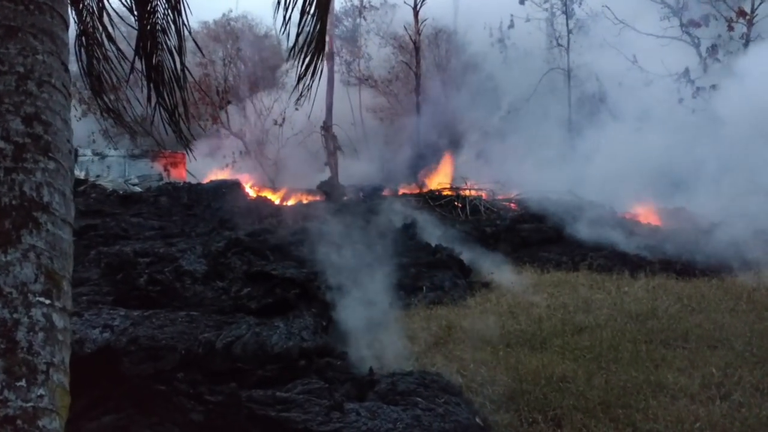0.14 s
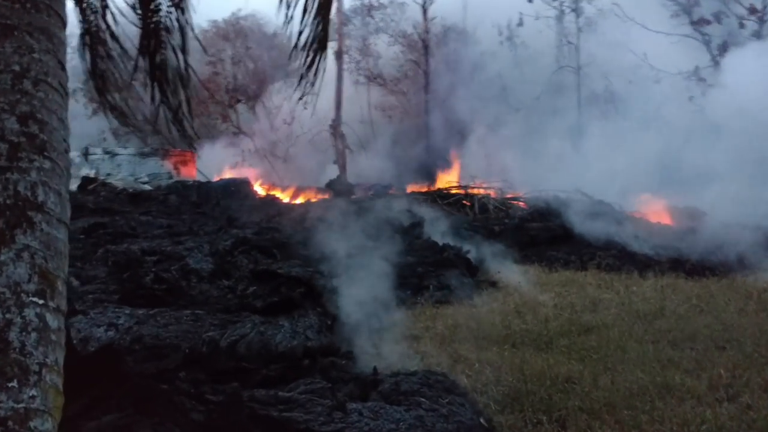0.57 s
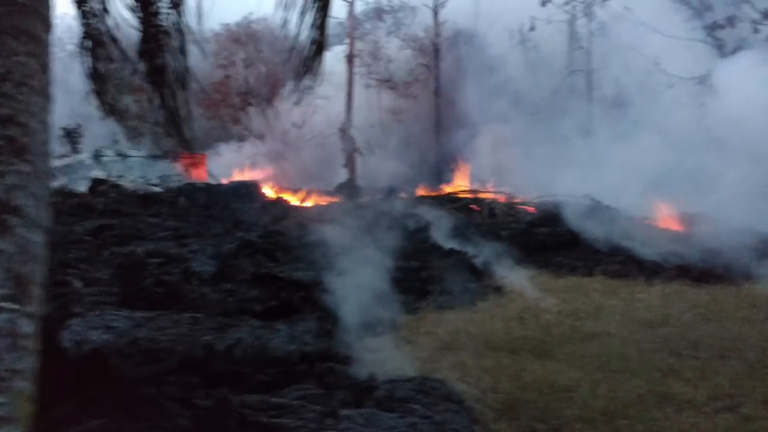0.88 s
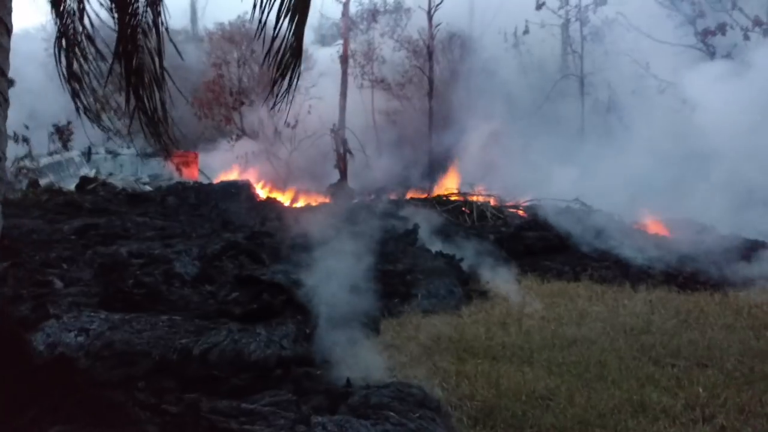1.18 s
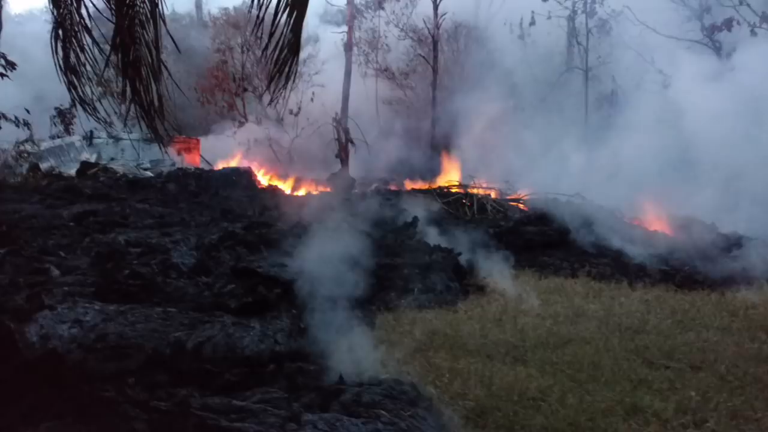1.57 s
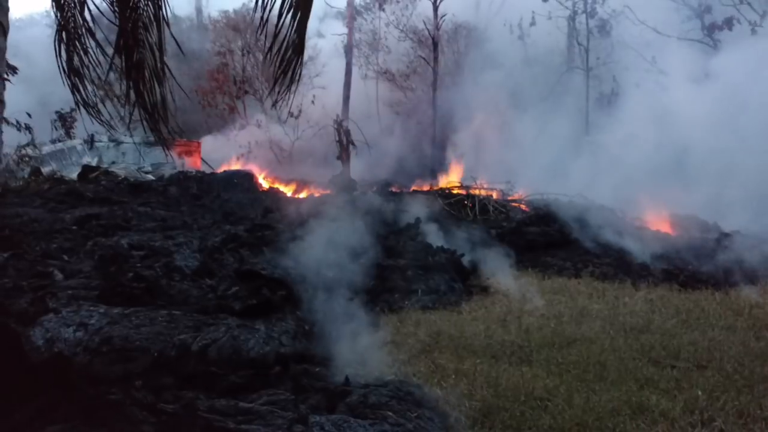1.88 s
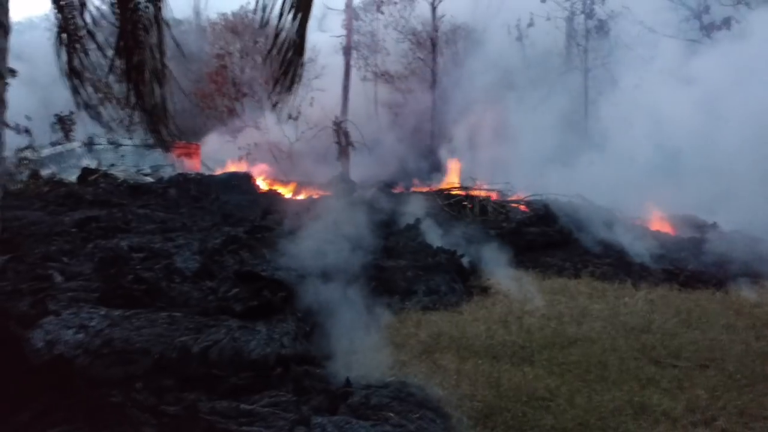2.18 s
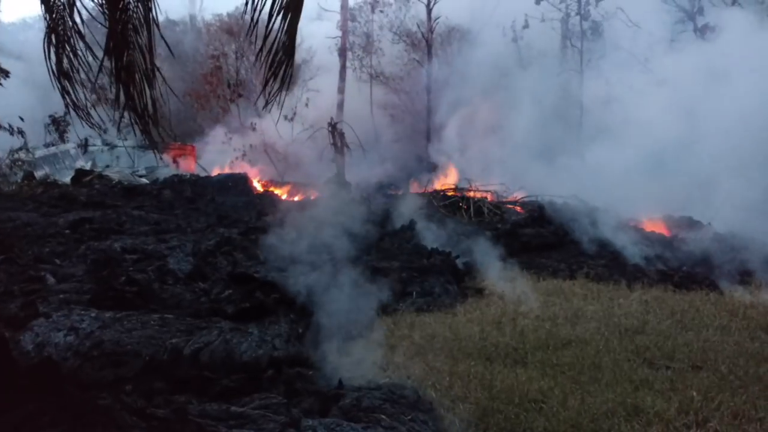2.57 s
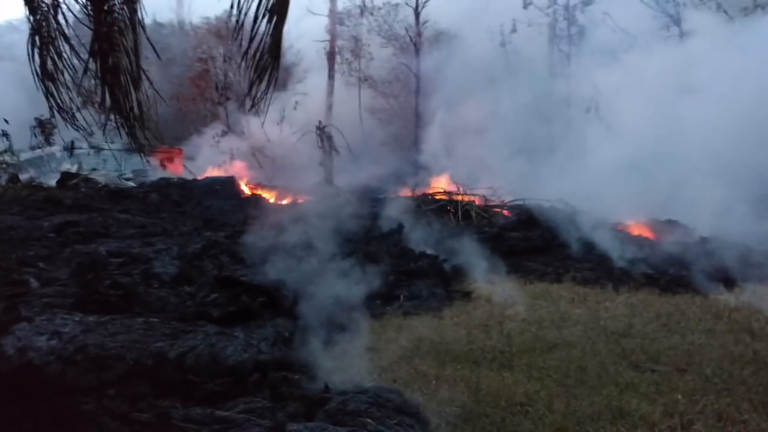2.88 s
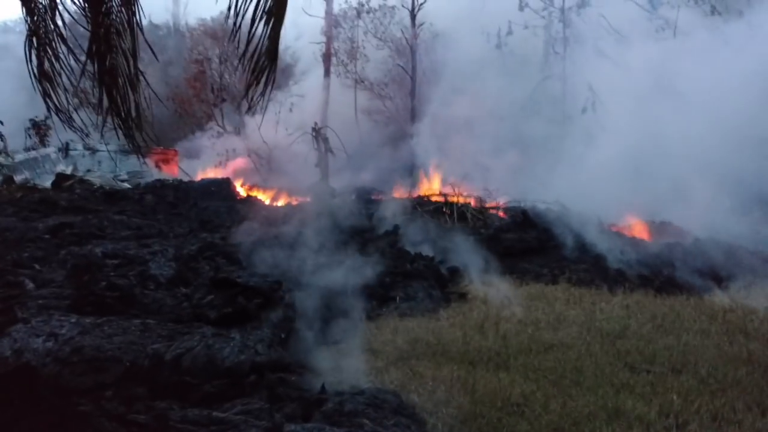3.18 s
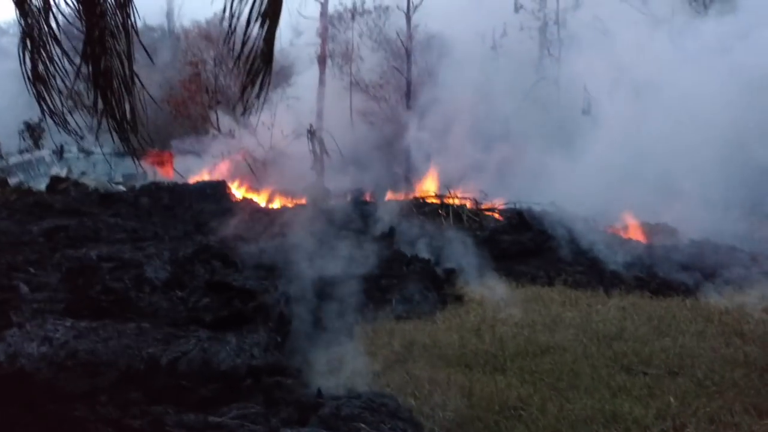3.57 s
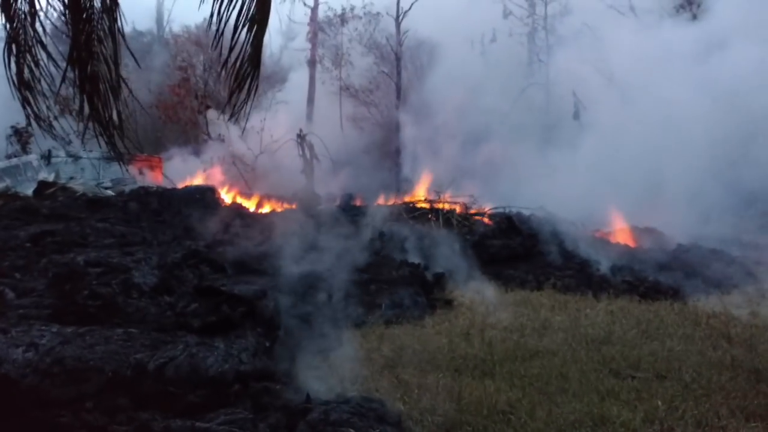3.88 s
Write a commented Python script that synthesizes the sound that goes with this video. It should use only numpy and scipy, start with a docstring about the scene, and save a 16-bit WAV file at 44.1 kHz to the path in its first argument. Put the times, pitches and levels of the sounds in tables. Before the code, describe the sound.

A turbulent gas jet flutters and gusts, its hollow throaty pitch wavering above a deep rumble. After a stronger, brighter surge it drops away, leaving faint steady outdoor hiss, dry little sputters, dull pops and high gliding bird chirps with short echoes from trees. Within about half a second the rush swells back and holds. Open air, natural wide stereo.

```python
"""Gas jets from a ground fissure

A low rumble, a hollow rush and a hiss, all banded turbulence noise, surge, ease and swell again.
In the lull the vent sputters in noise bursts and decaying pops; a small bird twitters in gliding tones
over a faint, steady outdoor hiss.
Two close microphone ports hear it; the recorder widens the image by inverted, delayed crossfeed."""
import sys
import numpy as np
from scipy import signal
from scipy.fft import rfft, irfft, next_fast_len
from scipy.io import wavfile
from scipy.ndimage import uniform_filter1d

SR = 44100
rng = np.random.default_rng(int(sys.argv[2]) if len(sys.argv) > 2 else 0)


def store_wav(level_fs):
    """Save 16-bit WAV to argv[1]."""
    pcm = np.round(np.clip(np.atleast_2d(level_fs), -1, 1) * 32767)
    wavfile.write(sys.argv[1], SR, pcm.T.astype(np.int16))


N = 178428   # samples

# Course of the jet, before colour and flicker:
# columns: t/s, rush level/dB, rumble level/dB, hiss level/dB, low-treble level/dB
JET_LEVELS = [(0.0, -29.5, -23.5, -46, -37), (0.06, -29.5, -33, -48, -40.5), (0.14, -30, -30, -45.5, -38),
              (0.23, -24.5, -29, -44.5, -36.5), (0.3, -27.5, -29.5, -45.5, -36.5),
              (0.37, -26.5, -28, -45, -39), (0.43, -24.5, -27.5, -41, -32), (0.5, -27, -33, -41, -37.5),
              (0.56, -29.5, -27, -43, -38), (0.66, -31.5, -33.5, -47.5, -41), (0.76, -31, -30.5, -46, -39),
              (0.9, -32, -34.5, -47, -39.5), (1.0, -30.5, -31, -43, -37.5),
              (1.16, -23.5, -28.5, -36, -30.5), (1.27, -27, -32, -40.5, -34.5),
              (1.4, -21.5, -30, -37.5, -32.5), (1.5, -22.5, -31, -37, -31), (1.6, -26, -34, -39, -35),
              (1.71, -23, -32.5, -42, -31), (1.79, -26, -34, -44, -38), (1.95, -34, -34.5, -55, -44),
              (2.2, -34, -35, -55, -46), (2.3, -31.5, -32.5, -48, -43.5), (2.47, -36, -37, -60, -48.5),
              (2.6, -38, -37.5, -57.5, -48.5), (2.69, -42, -35, -57, -42.5), (2.73, -44, -43, -60, -55),
              (2.87, -44, -42, -67, -52), (3.02, -39, -33.5, -63, -52.5), (3.14, -34, -34.5, -57.5, -46),
              (3.22, -32, -29.5, -52.5, -44), (3.29, -28.5, -28.5, -47.5, -38),
              (3.34, -25.5, -26, -43, -38), (3.4, -25.5, -28, -43, -34.5), (3.5, -23, -27.5, -40.5, -32),
              (3.62, -23, -30.5, -41, -34), (3.75, -22.5, -29.5, -41, -33), (3.84, -21.5, -29, -39, -30.5),
              (3.97, -24.5, -35.5, -43.5, -37), (4.05, -26.5, -29.5, -45.5, -36)]


def from_db(db):
    """Level to amplitude: 20 dB is a factor of ten."""
    return 10 ** (np.asarray(db) / 20)


def rms_one(x):
    """Normalization of the mean power to 1."""
    return x / np.sqrt(np.mean(x ** 2) + 1e-20)


def in_time(rows):
    """Linear interpolation of the columns after t/s, one value a sample."""
    s, *columns = np.transpose(rows)
    return [np.interp(np.arange(N) / SR, s, column) for column in columns]


def at_hz(points, hz, column=1):
    """Linear interpolation of a table column on a log-frequency axis."""
    points = np.array(points)
    return np.interp(np.log(hz), np.log(points[:, 0]), points[:, column])


def drift(rate_hz):
    """Slow random fluctuation of rms 1: noise through two equal one-pole low-passes."""
    step = 20   # samples between coarse noise values
    r = np.exp(-2 * np.pi * rate_hz * step / SR)
    noise = rng.standard_normal(N // step + 2002)
    slow = rms_one(signal.lfilter([1], [1, -2 * r, r * r], noise)[2000:])   # start-up cut away
    return np.interp(np.arange(N) / step, np.arange(len(slow)), slow)


def band(x, low_hz, high_hz):
    """Butterworth band-pass: maximally flat between its edges."""
    sos = signal.butter(2, [low_hz, min(high_hz, .45 * SR)], "band", fs=SR, output="sos")
    return signal.sosfilt(sos, x)


def lagged(hz, lag_s):
    """Frequency response of a delay: phase falls linearly with frequency."""
    return np.exp(-2j * np.pi * hz * lag_s)


def port_noise():
    """Partial coherence: white noise common to both ports but lagged, plus a scattered part for each."""
    # What the ports hear alike and how they differ:
    # columns: f/Hz, common power share (0-1), right-port lag/s, left-over-right level/dB
    coherence = [(40, 0.995, 1e-6, -2), (75, 0.99, 1e-6, 0.5), (132, 1, 1e-6, 0.45), (242, 0.98, 1e-6, 0),
                 (714, 0.88, 5e-6, -3), (1090, 0.56, 0.00007, -5), (1500, 0.29, 0.00014, 2),
                 (2260, 0.69, 0.000062, -2.5), (2490, 0.96, 0.00029, 6), (3140, 0, 0.000037, 12.5),
                 (3900, 0.81, 0.00009, 5), (8500, 0.11, 0.000057, 3), (12700, 0.33, 0.00016, -3.5)]
    size = next_fast_len(N)
    hz = np.maximum(np.arange(size // 2 + 1) * SR / size, 1)
    common, left, right = rfft(rng.standard_normal((3, size)))
    share, lag_s, balance_db = (at_hz(coherence, hz, column=c) for c in range(1, 4))
    share = np.clip(share, 0, 1)
    direct = np.sqrt(share) * common * np.array([np.ones(len(hz)), lagged(hz, lag_s)])
    both = direct + np.sqrt(1 - share) * np.array([left, right])
    both *= from_db([balance_db / 2, -balance_db / 2])
    return irfft(both, size)[:, :N]


def jet_and_outdoors():
    """Turbulence noise in third-octave bands; the steady outdoor hiss adds to the jet in power."""
    # Spectral colour added to the jet's course; columns: f/Hz, level/dB
    jet_colour = [(30, -8), (60, 16.5), (125, 28.5), (220, 26), (310, 14), (480, 9.5), (680, 10.5),
                  (1000, 5), (1350, 5.5), (2100, 3.5), (2800, 7.5), (3500, 10.5), (4400, 7), (6000, 11.5),
                  (9300, 11), (10500, 6), (15000, -1.5)]
    # Steady hiss of leaves, insects and far vents, as gain on the white noise; columns: f/Hz, level/dB
    outdoors = [(100, -26), (1000, -34), (2500, -86), (4500, -30), (7000, -47.5), (9000, -68), (15000, -59)]
    # where each level rules; between these pitches one hands over to the next
    rumble_top_hz, rush_hz, low_treble_hz, hiss_foot_hz = 272, (670, 1986), (2720, 4530), 6000
    strong_jet_tilt = .2   # dB per octave that the rush brightens for each dB it gains

    rush_db, rumble_db, hiss_db, treble_db = uniform_filter1d(in_time(JET_LEVELS), size=1500)   # smoothed
    white = [port_noise(), port_noise()]   # neighbouring bands get unrelated noise
    # eddies flicker all bands together, regions of four bands in part, and each band alone
    eddies_db = 0.7 * drift(16) + 0.6 * drift(60)
    region_db = [0.6 * drift(12) for _ in range(8)]
    edges, out = 22 * 2 ** (np.arange(30) / 3), 0   # Hz
    for k, (low, high) in enumerate(zip(edges, edges[1:])):
        hz = np.sqrt(low * high)
        deep = at_hz([(rumble_top_hz, 1), (rush_hz[0], 0)], hz)
        bright = at_hz([(rush_hz[1], 0), (low_treble_hz[0], 1)], hz)
        top = at_hz([(low_treble_hz[1], 0), (hiss_foot_hz, 1)], hz)
        middle = 1 - deep - bright
        level_db = deep * rumble_db + middle * rush_db + (bright - top) * treble_db + top * hiss_db
        level_db += middle * strong_jet_tilt * (rush_db - rush_db.mean()) * np.log2(hz / 900)
        flicker_db = (1 - .6 * deep) * eddies_db + region_db[k // 4] + 0.8 * drift(20)
        jet = from_db(level_db + at_hz(jet_colour, hz) + flicker_db)
        gain = np.hypot(jet, from_db(at_hz(outdoors, hz)))
        out = out + gain * band(white[k % 2], low, high)
    return out


def throat():
    """Resonance: the rush rings the vent throat in two narrow noise bands that glide together."""
    # Hollow tones; columns: t/s, lower pitch f/Hz, level over the rush/dB (before the port levels)
    tones = [(0.0, 685, -9), (0.3, 721, -27), (0.55, 640, -6.5), (0.9, 639.4, -11), (1.15, 677.5, -15),
             (1.3, 599, -9.5), (1.4, 727, -9), (1.5, 630, -10), (1.75, 676, -11), (2.0, 678, -9),
             (2.8, 684.6, -8.5), (3.3, 697.3, -12), (3.7, 759.6, -12), (4.05, 756, -16)]
    # Level added at the left and right port/dB
    port_db = [
        [-8.5],
        [-6.5],
    ]
    width_hz, overtone, overtone_db = 77, 1.9, -2.5   # the overtone is a multiple of the lower pitch

    hz, over_db = in_time(tones)
    turns, out = np.cumsum(uniform_filter1d(hz, size=1500)) / SR, 0
    narrow = signal.butter(2, width_hz / 2, fs=SR, output="sos")
    settle = SR // 10   # filter start-up, cut away
    for multiple, level_db in ((1, 0), (overtone, overtone_db)):
        noise = rng.standard_normal((2, N + settle))
        a, b = rms_one(signal.sosfilt(narrow, noise)[:, settle:])
        phase = 2 * np.pi * multiple * turns
        tone = a * np.cos(phase) + b * np.sin(phase)   # low-pass noise moved up to the pitch
        out = out + from_db(level_db + 3.1 * drift(12.0)) * tone   # comes in patches
    rush_db = uniform_filter1d(in_time(JET_LEVELS)[0], size=1500)
    return from_db(port_db + over_db + rush_db) * out


def puffs():
    """Gated turbulence: each sputter is a gritty burst of noise, quick to open and quick to shut."""
    # Sputters of the vent; columns: t/s, length/s, rms level before gating/dB, low edge f/Hz, high edge f/Hz
    sputters = [(0.415, 0.043, -37, 2500, 11900), (0.761, 0.028, -36, 400, 9000),
                (2.252, 0.015, -35.5, 2000, 7890), (2.278, 0.008, -41, 2800, 4980),
                (2.291, 0.0059, -31, 3000, 10600), (2.322, 0.022, -31.5, 250, 750),
                (2.576, 0.0054, -36.5, 600, 2000), (2.584, 0.014, -38, 200, 2000),
                (2.615, 0.0048, -46, 800, 2000), (2.645, 0.0068, -41, 3500, 9000),
                (2.653, 0.05, -43.5, 2880, 15000), (2.64, 0.055, -38, 500, 1900),
                (2.645, 0.045, -37.5, 564, 1020), (2.723, 0.03, -40.5, 150, 400),
                (2.785, 0.0071, -43, 597, 1576), (2.815, 0.025, -47, 550, 892),
                (2.87, 0.0054, -41, 500, 1400), (2.929, 0.0095, -41, 610, 1300),
                (2.973, 0.0033, -40, 400, 1260), (3.094, 0.011, -34, 300, 1140),
                (3.159, 0.031, -34.5, 397, 1320)]
    opens_s, shuts_s = .004, 0.0029   # linear rise; time constant of the exponential fall

    out, white, t = np.zeros((2, N)), port_noise(), np.arange(N) / SR
    grit = from_db(3.5 * drift(320))
    for s, length, level_db, low_hz, high_hz in sputters:
        span = slice(int(s * SR) - 500, int((s + length) * SR) + 1500)
        opening = np.clip((t[span] - s) / opens_s, 0, 1)
        opening *= np.exp(-np.maximum(t[span] - s - length, 0) / shuts_s)
        burst = rms_one(grit[span] * band(white[:, span], low_hz, high_hz))
        out[:, span] += from_db(level_db) * opening * burst
    return out


def pops():
    """Impulse response: a sudden pressure drop rings the vent mouth briefly, each at a pitch of its own."""
    # Sharp pops inside the sputters; columns: t/s, peak level before the band-pass/dB
    onsets = [(2.336, -29), (2.341, -27), (2.574, -26), (2.5875, -22), (2.621, -31), (2.6525, -22),
              (2.6595, -21), (2.6672, -21), (2.678, -26), (2.685, -27), (2.69, -24), (2.972, -26),
              (3.097, -28)]
    centre_hz, t60_s, right_lag_s = 850, .008, 6e-5

    out, t = np.zeros(N), np.arange(SR // 50) / SR
    spread_octaves = rng.uniform(-.3, .3, len(onsets))
    for (s, peak_db), octaves in zip(onsets, spread_octaves):
        ring = from_db(peak_db - 60 * t / t60_s) * np.cos(2 * np.pi * centre_hz * 2 ** octaves * t)
        start = int(s * SR)
        out[start:start + len(t)] -= ring
    out = band(out, 210, 3000)
    right = np.interp(np.arange(N) - right_lag_s * SR, np.arange(N), out)
    return np.array([out, right])


def bird():
    """Frequency modulation: gliding, trembling whistles; the trees scatter decaying echoes to each port."""
    # Phrases; columns: level before carry and breaks/dB, tremble as a share of pitch, right-port lag/s,
    # pitch path as points of (t/s, f/Hz)
    phrases = [(-51, .01, 295e-6, [(2.045, 4300), (2.065, 4550), (2.095, 4450)]),
               (-52, .01, 295e-6, [(2.37, 3800), (2.415, 3650)]), (-46, .005, 300e-6, [(2.476, 6900),
               (2.488, 6400), (2.5, 5900), (2.524, 5950), (2.545, 4900), (2.57, 4550), (2.597, 4500)]),
               (-56, .015, 295e-6, [(2.6, 3900), (2.64, 3600)]), (-48, .008, 295e-6, [(2.728, 6120),
               (2.742, 7300), (2.772, 7250)]), (-43, .004, 295e-6, [(2.764, 7300), (2.772, 7000),
               (2.786, 5150), (2.796, 5350), (2.812, 6300), (2.821, 6340), (2.838, 4750), (2.858, 4400),
               (2.879, 5120), (2.898, 4300)]), (-54, .015, 295e-6, [(2.815, 4200), (2.845, 3650)]),
               (-48, .035, 325e-6, [(2.858, 7500), (2.905, 6500)]), (-51, .01, 295e-6, [(2.742, 6100),
               (2.765, 6350)]), (-48, .03, 325e-6, [(2.93, 7050), (2.978, 6700)]),
               (-45, .03, 333e-6, [(3.032, 7700), (3.045, 7200), (3.062, 6500), (3.07, 6000),
               (3.095, 5950)]), (-50, .01, 295e-6, [(3.06, 5900), (3.085, 5470), (3.102, 4600),
               (3.112, 5100), (3.13, 4450), (3.165, 4250)]), (-49, .01, 295e-6, [(3.18, 7800),
               (3.208, 6370)])]
    # How well each pitch of the whistle carries; columns: f/Hz, level/dB
    carry = [(4300, 1), (5100, 2), (5700, -4), (6300, -5), (7300, -8)]
    fade_s, breaks_depth_db = 0.007, 1.8   # fade in and out; rms depth of the breaks
    trees_db, trees_t60_s = -8, .15   # energy of all echoes against the direct song; their decay

    t, song = np.arange(N) / SR, np.zeros((2, N))
    tremble = drift(150)
    breaks_db = breaks_depth_db * drift(38)   # gusts and leaves break the whistle up
    for level_db, waver, lag_s, path in phrases:
        hz = uniform_filter1d(in_time(path)[0], size=250) * (1 + waver * tremble)
        singing = np.clip(np.minimum(t - path[0][0], path[-1][0] - t) / fade_s, 0, 1)
        level_db = level_db + at_hz(carry, hz) + breaks_db
        turns = np.cumsum(hz) / SR - np.array([[0], [lag_s]]) * hz
        song += singing * from_db(level_db) * np.sqrt(2) * np.sin(2 * np.pi * turns)
    echo_t = t[:SR // 5]
    trees = rng.standard_normal((2, len(echo_t))) * from_db(-60 * echo_t / trees_t60_s)
    trees *= from_db(trees_db) / np.linalg.norm(trees, axis=1, keepdims=True)
    return song + signal.fftconvolve(song, trees, axes=1)[:, :N]


def scene():
    """Superposition of all sources at the two ports."""
    return jet_and_outdoors() + throat() + puffs() + pops() + bird()


def record(dry):
    """Comb filtering: inverted, delayed crossfeed combs sum and difference at interleaved pitches."""
    cross_delay_s, cutoff_hz = 17 / SR, 15150
    # crossfeed felt by each: bass share, then the shelf falls from f/Hz to f/Hz
    sum_feed, difference_feed = (1.212, 1102, 1610), (1.06, 740, 1260)

    size = next_fast_len(N + 2000)
    hz = np.arange(size // 2 + 1) * SR / size
    feed = []
    for share, from_hz, to_hz in (sum_feed, difference_feed):
        shelf = share * (1 + 1j * hz / to_hz) / (1 + 1j * hz / from_hz)
        feed.append(shelf * lagged(hz, cross_delay_s))
    left, right = rfft(dry, size)
    both = (left + right) / 2 * (1 - feed[0])
    apart = (left - right) / 2 * (1 + feed[1])
    wide = irfft(np.array([both + apart, both - apart]), size)[:, :N]
    top_cut = signal.ellip(12, .5, 70, cutoff_hz, fs=SR, output="sos")
    return signal.sosfilt(top_cut, wide)


dry = scene()
out = record(dry)
store_wav(out)
```